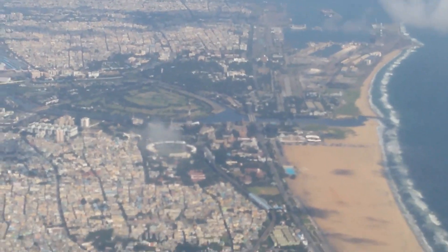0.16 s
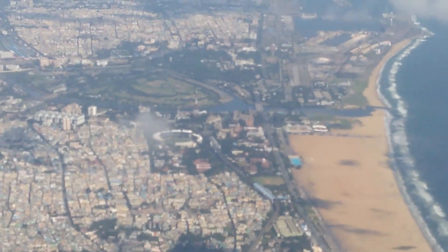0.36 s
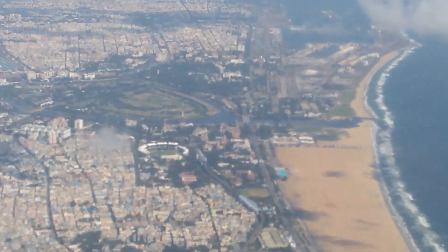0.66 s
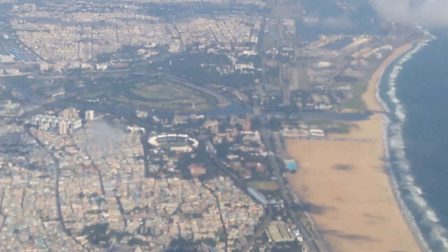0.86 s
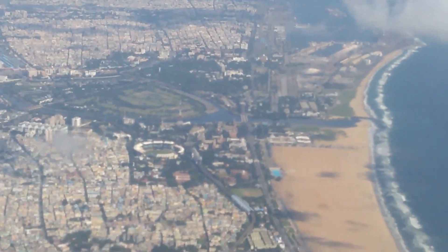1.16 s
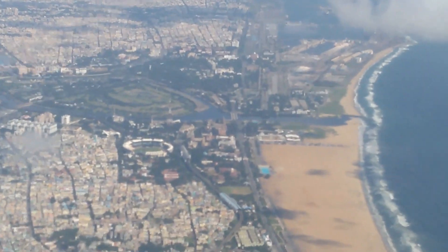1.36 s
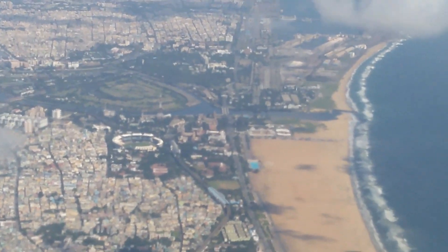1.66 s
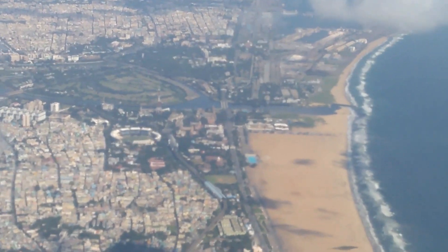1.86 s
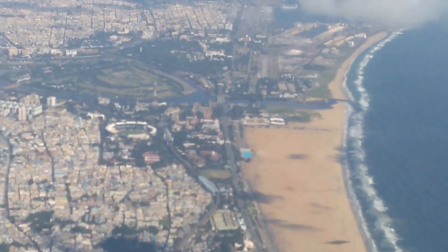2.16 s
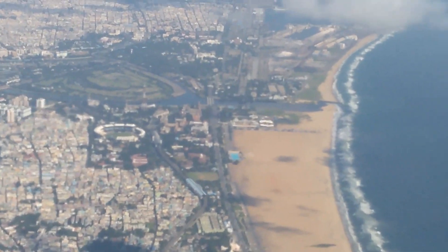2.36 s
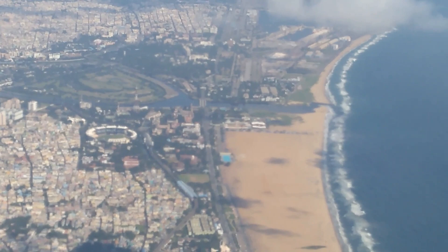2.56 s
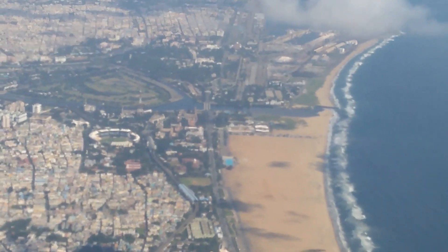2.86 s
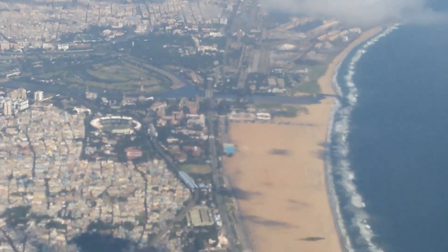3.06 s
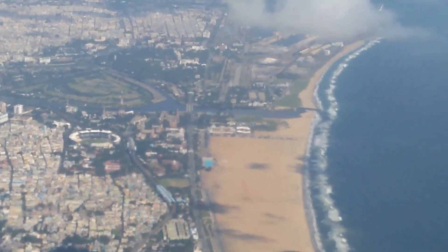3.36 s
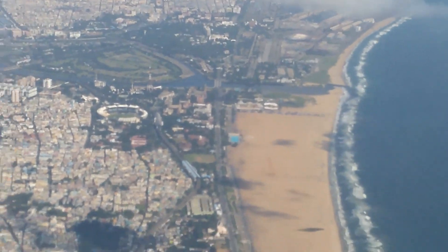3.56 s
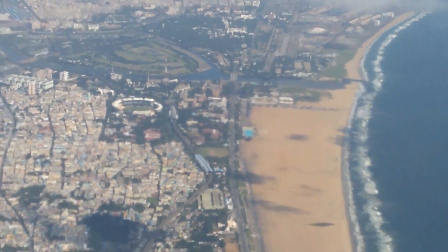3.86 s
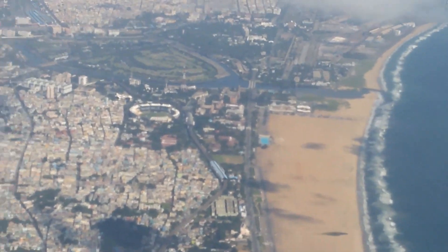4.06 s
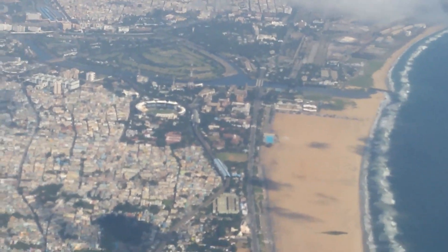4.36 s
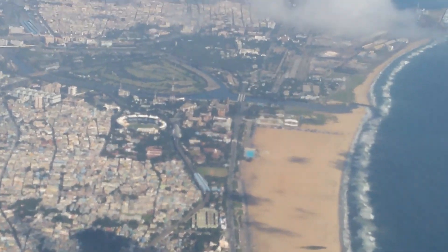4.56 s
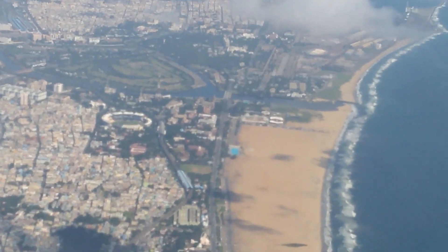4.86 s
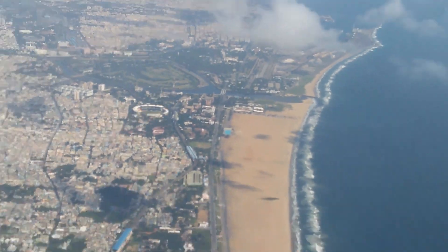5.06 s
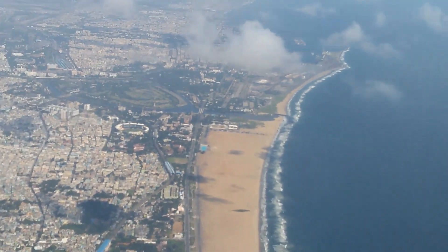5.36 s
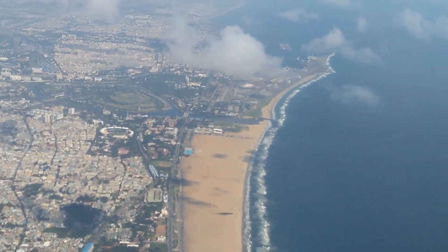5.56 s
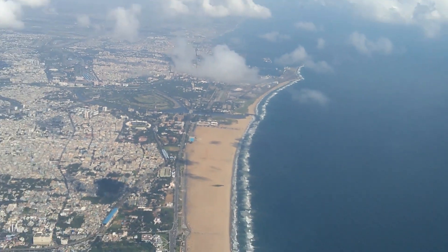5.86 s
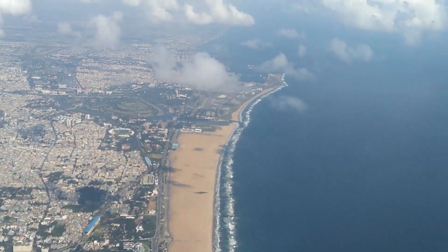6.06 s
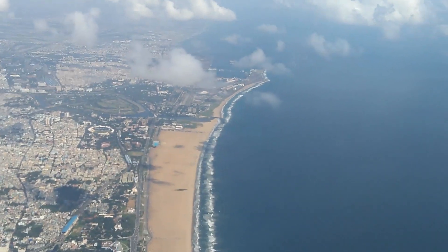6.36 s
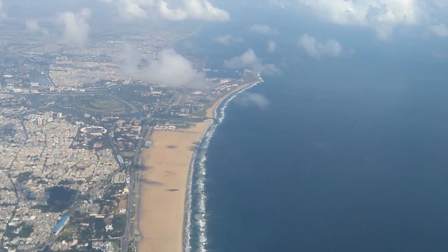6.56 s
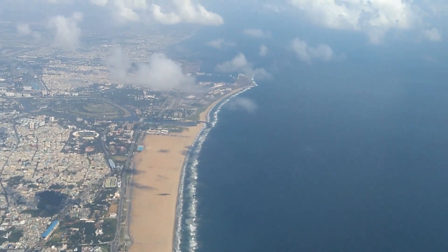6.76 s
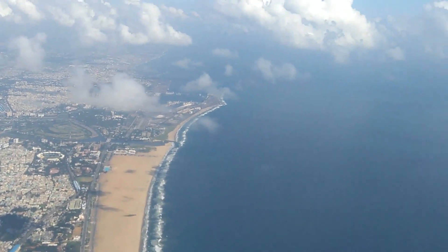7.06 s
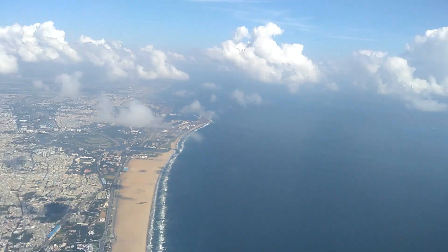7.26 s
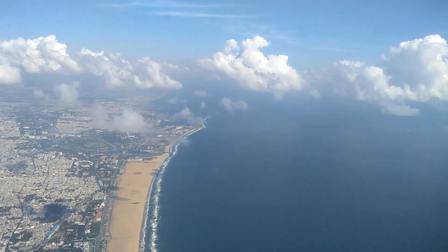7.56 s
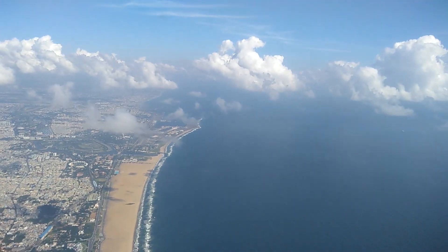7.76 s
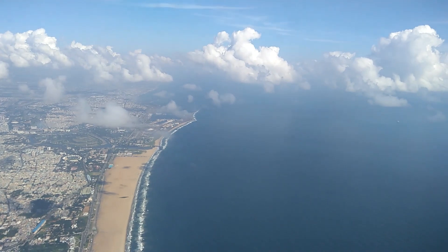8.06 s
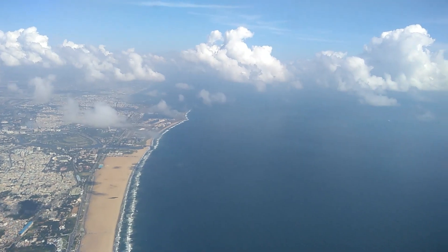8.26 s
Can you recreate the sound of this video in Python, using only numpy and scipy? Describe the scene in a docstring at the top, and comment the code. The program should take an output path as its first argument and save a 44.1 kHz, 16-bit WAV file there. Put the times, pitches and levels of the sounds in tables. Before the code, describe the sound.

A loud, low roar of jet engines and rushing air fills the cabin of a climbing airliner, unbroken for about eight and a half seconds. It overloads a small microphone at the window, so it sounds squashed, with a dense crackling rasp throughout. A hollow cabin boom swells gently around 1.6, 3.6 and 6.2 seconds. Underneath, one low engine hum holds its pitch while rising and falling in strength, joined by faint, steady blade whines. Rough air adds short, soft, very deep buffets near 2.4, 2.6, 3.4, 4.6, 5.9 and 7.3 seconds. A dozen crisp overload ticks are scattered through the roar, the clearest near 0.3, 1.6, 2.1, 3.4, 5.3 and 7.1 seconds. A faint high hiss with a thin whistle in it flickers behind everything. The overall loudness stays nearly constant to the end.

```python
"""Rushing air and booming engines fill the cabin of a climbing airliner.
Under them: one low shaft hum, faint blade whines and deep buffets of rough air.
The rumble overloads a small camera at the window: its input clips, its bass filter rings after
every flat top and a fast limiter holds each swing down. The roar gets a dense crackling rasp
with a few crisp ticks. A faint high hiss flickers behind it."""
import sys
import numpy as np
from scipy import signal
from scipy.fft import rfft, irfft
from scipy.io import wavfile

SR = 44100
rng = np.random.default_rng(int(sys.argv[2]) if len(sys.argv) > 2 else 0)


def master(y):
    """Save y as 16-bit WAV."""
    cut = np.clip(np.atleast_2d(y).T, -1, 1)
    pcm = np.round(cut * 32767)  # scale
    wavfile.write(sys.argv[1], SR, pcm.astype(np.int16))


N = 370435
TIME_S = np.arange(N) / SR


def gain_of(db):
    """Decibels to an amplitude factor."""
    return 10 ** (np.asarray(db) / 20)


def level(curve):
    """Gain per sample from (s, dB) points."""
    return gain_of(np.interp(TIME_S, *np.transpose(curve)))


def unit_rms(x):
    """Scales to rms 1."""
    return x / np.sqrt(np.mean(x ** 2) + 1e-20)


def coloured(shape):
    """Noise of rms 1 with amplitude spectrum shape(Hz)."""
    white = rfft(rng.standard_normal(N))
    return unit_rms(irfft(white * shape(np.fft.rfftfreq(N, 1 / SR)), N))


def noise(spectrum):
    """Noise of rms 1 shaped by (Hz, dB) points on a log-frequency axis."""
    hz, db = np.transpose(spectrum)
    return coloured(lambda f: gain_of(np.interp(np.log(f + 1), np.log(hz + 1), db)))


def drift(rate_hz):
    """Random wander of rms 1, up to about rate_hz."""
    return coloured(lambda f: np.exp(-(f / rate_hz) ** 2) * (f > 0))


def steadied(x, smooth_s=.07):
    """Evens out chance swells longer than smooth_s; rms 1."""
    power = signal.fftconvolve(x ** 2, signal.windows.hann(int(2 * smooth_s * SR)), "same")
    return unit_rms(x / np.sqrt(power))


# Each row: frequency in Hz, relative noise density in dB.
HISS_SPECTRUM = [(100, 2.5), (3000, 5.5), (5400, -3.5), (6100, 6.5), (6800, -3.5), (9000, -8.5),
                 (11200, -11), (12000, 2.5), (12800, -11.5), (15500, -14)]

def faint_hiss(level_db=-63, depth_db=2):
    """A faint, flickering high hiss with a thin whistle in it."""
    return gain_of(level_db + depth_db * drift(rate_hz=30)) * noise(HISS_SPECTRUM)


# Each row: start in seconds, level in dB.
OVERLOAD_TICKS = [(0.315, -8), (1.393, -12), (1.581, -8), (2.121, -9), (3.209, -14.5), (3.369, -8),
                  (3.438, -12), (5.173, -10), (5.286, -7), (5.857, -11), (7.084, -7), (7.266, -11)]

def ticks(wave, rise_s=.00014, fall_s=.00074):
    """The overloaded signal jumps sharply against its swing and slides back."""
    out = np.zeros(N)
    for start_s, db in OVERLOAD_TICKS:
        age_s = np.maximum(TIME_S - start_s, 0)
        pulse = np.minimum(age_s / rise_s, 1) * np.exp(-age_s / fall_s)
        out -= np.sign(wave[int(start_s * SR)]) * gain_of(db) * pulse
    return out


# Each row: frequency in Hz, level in dB.
BLADE_WHINES = [(1125, -46), (1430, -57)]
# Each row: time in seconds, hum level in dB.
HUM_LEVELS = [(0.25, -14), (0.62, -23.5), (1.4, -17.5), (2.2, -21), (2.65, -24), (3.1, -16), (3.5, -21),
              (4.1, -22), (4.75, -16), (5.1, -17.5), (5.45, -15), (5.95, -19), (6.4, -15), (6.9, -19.5),
              (7.15, -25), (7.6, -19.5), (8.2, -17)]

def fan(shaft_hz=78.8, wander=.0006):
    """At constant climb power the shaft hums and the blades whine, near steady in pitch."""
    speed = 1 + wander * drift(rate_hz=2)
    phase_per_hz = 2 * np.pi * np.cumsum(speed) / SR
    hum = level(HUM_LEVELS) * unit_rms(np.sin(shaft_hz * phase_per_hz))
    whines = sum(gain_of(db) * unit_rms(np.sin(hz * phase_per_hz)) for hz, db in BLADE_WHINES)
    return hum + whines


# Each row: time of the peak in seconds, level in dB.
AIR_BUFFETS = [(2.35, -17), (2.6, -18.5), (3.42, -17), (4.6, -16.5), (5.9, -18), (7.26, -16.5)]

def buffets(centre_hz=49.5, width_hz=7, width_s=.076):
    """Rough air shakes the fuselage: short, soft swells of very deep rumble."""
    shaking = steadied(coloured(lambda f: np.exp(-((f - centre_hz) / width_hz) ** 2)))
    swells = sum(gain_of(db) * np.exp(-((TIME_S - peak_s) / width_s) ** 2) for peak_s, db in AIR_BUFFETS)
    return shaking * swells


# Each row: resonance in Hz, half width in Hz, relative level in dB.
CABIN_RESONANCES = [(139.2, 10.2, -3.5), (167.4, 12.9, 1), (259.3, 10.45, -2.5)]
# Each row: time in seconds, boom level in dB.
BOOM_LEVELS = [(0, -14.5), (0.5, -14.5), (0.95, -17), (1.6, -12.5), (2.0, -17), (2.75, -15.5), (3.3, -18),
               (3.6, -12.5), (4.55, -19.5), (5.1, -15.5), (5.5, -18), (6.15, -13), (7.15, -16.5),
               (7.45, -16.5), (8.4, -18.5)]

def boom():
    """Engine noise rings in the cabin's air resonances, slowly swelling and easing."""
    def response(f):
        return sum(gain_of(db) / (1 + ((f - hz) / width_hz) ** 2) for hz, width_hz, db in CABIN_RESONANCES)
    return level(BOOM_LEVELS) * steadied(coloured(response))


# Each row: frequency in Hz, relative noise density in dB.
ROAR_SPECTRUM = [(10, -7.5), (25, -1.5), (50, 0.5), (68, 0), (105, -3), (140, -1.5), (215, -4), (310, -4.5),
                 (420, -15.5), (700, -28), (1500, -36), (4000, -58.5), (15000, -81.5)]
# Each row: time in seconds, gain of the roar's upper band in dB.
RUSH_GAINS = [(0.1, 1.5), (0.95, -1.5), (1.15, 1.5), (1.9, 0.5), (2.3, -1), (2.9, 1), (3.4, 0), (3.75, -.5),
              (4.25, 1.5), (4.6, -0.5), (5.05, 1), (5.45, -1), (5.75, 0.5), (6.15, 0), (6.62, 1),
              (7.28, -1.5), (7.6, .5), (8.3, 1)]

def roar(level_db=-10.5, split_hz=190, throb_db=1.5):
    """Exhaust and turbulent air: even depths under low mids that swell, ease and throb."""
    air = noise(ROAR_SPECTRUM)
    depths = signal.sosfiltfilt(signal.butter(4, split_hz, fs=SR, output="sos"), air)
    rush = air - depths
    throb = gain_of(throb_db * np.tanh(drift(rate_hz=6)))
    even_depths = depths.std() * steadied(depths)
    throbbing_rush = throb * level(RUSH_GAINS) * rush.std() * steadied(rush)
    return gain_of(level_db) * (even_depths + throbbing_rush)


def bass_filter(x, shelf_hz=120, cut_hz=44.74):
    """The microphone lifts the bass, then cuts the depths steeply: flat tops bend and swing back."""
    lifted = x + signal.lfilter(*signal.butter(1, shelf_hz, fs=SR), x)
    return signal.sosfilt(signal.butter(6, cut_hz, "high", fs=SR, output="sos"), lifted)


def limiter(x, ceiling=.49, release_db_per_s=1500):
    """Turns down each half wave that would pass the ceiling, then recovers; steps at zero crossings."""
    crossings = np.diff(x > 0)
    starts = np.r_[0, np.flatnonzero(crossings) + 1]
    peaks = np.maximum.reduceat(abs(x), starts)
    over_db = 20 * np.log10(np.maximum(peaks / ceiling, 1))
    recovery_db = release_db_per_s * starts / SR
    cut_db = np.maximum.accumulate(over_db + recovery_db) - recovery_db
    half_wave_index = np.r_[0, np.cumsum(crossings)]
    return x / gain_of(cut_db)[half_wave_index]


def scene():
    """Sound pressure at the window seat; turbulence flutters the roar and the boom."""
    flutter = gain_of(db=.56 * drift(rate_hz=30.7))
    return (flutter * (roar() + boom()) + buffets() + fan())[None]


def record(dry):
    """Overloaded input, bass filter and limiter; then a faint hiss, ticks and band limits."""
    rail, drive = gain_of(db=-13.3), gain_of(db=7.9)
    low_edge_hz, high_edge_hz = 33, 15750
    clipped = np.clip(dry[0], -rail, rail)  # each corner is a tiny click: together they make the rasp
    held = limiter(drive * bass_filter(clipped))
    out = (held + faint_hiss() + ticks(held)) * signal.windows.tukey(N, .001)
    out = signal.sosfiltfilt(signal.butter(4, low_edge_hz, "high", fs=SR, output="sos"), out)
    low_pass = signal.firwin(511, high_edge_hz, window=("kaiser", 9), fs=SR)
    return signal.oaconvolve(out, low_pass, "same")[None]


dry = scene()
out = record(dry)
master(out)
```